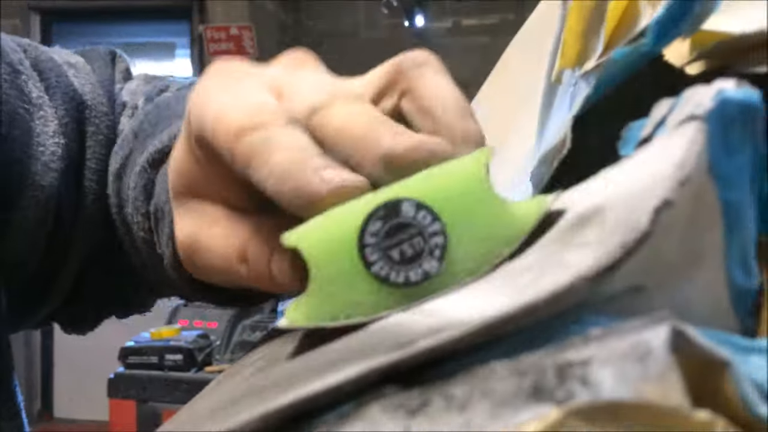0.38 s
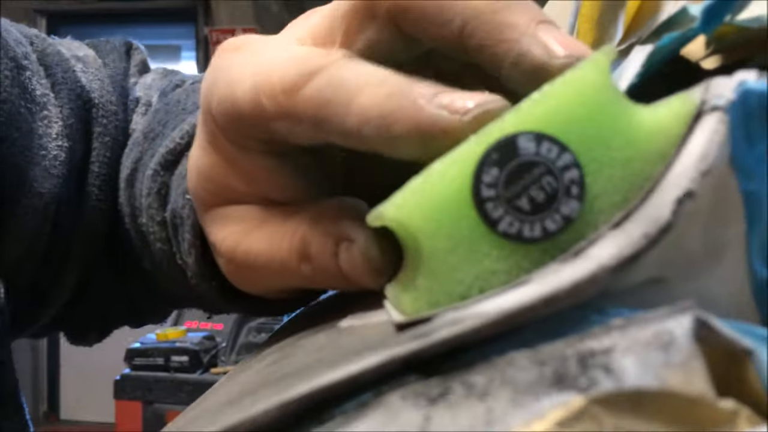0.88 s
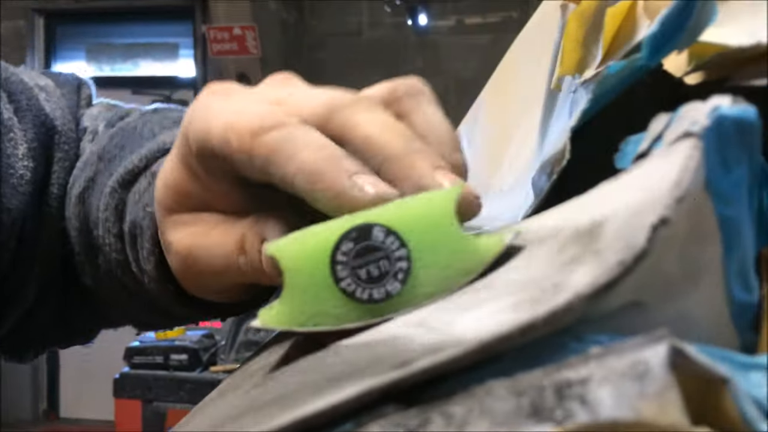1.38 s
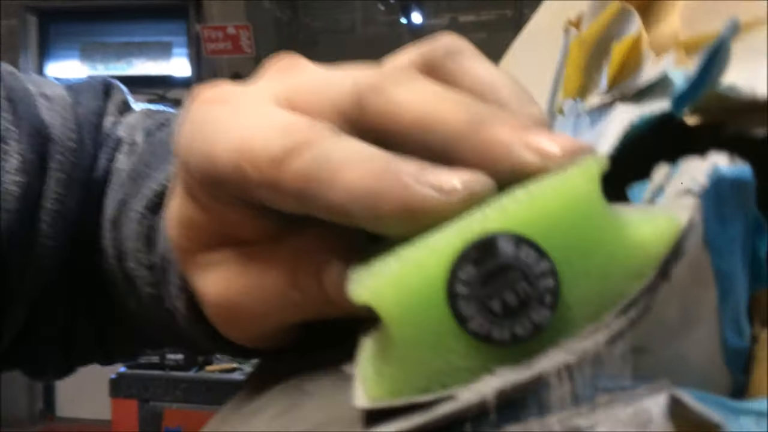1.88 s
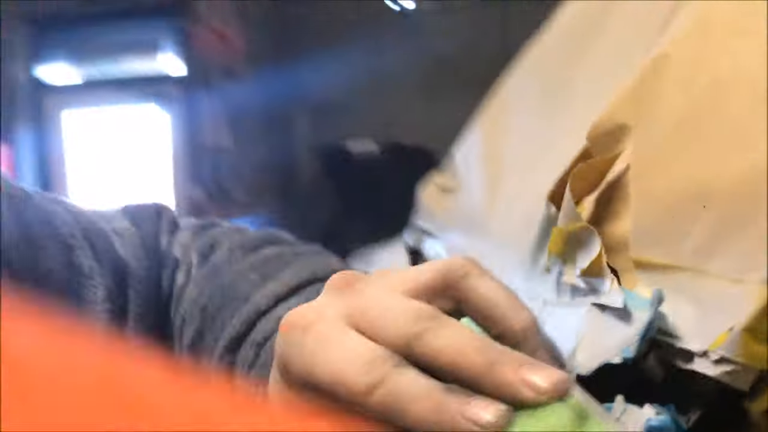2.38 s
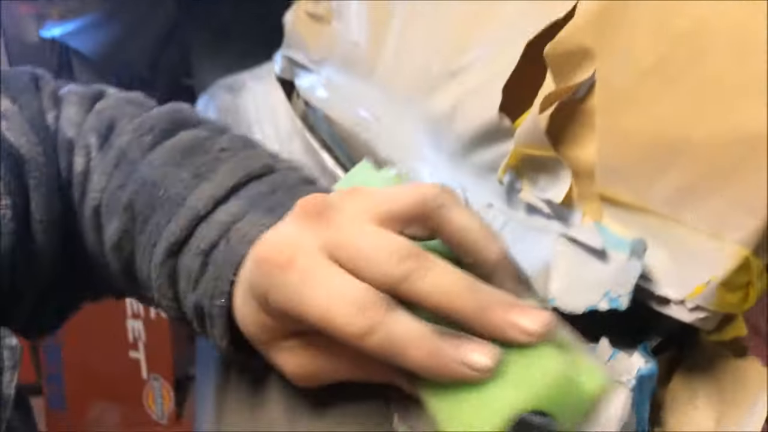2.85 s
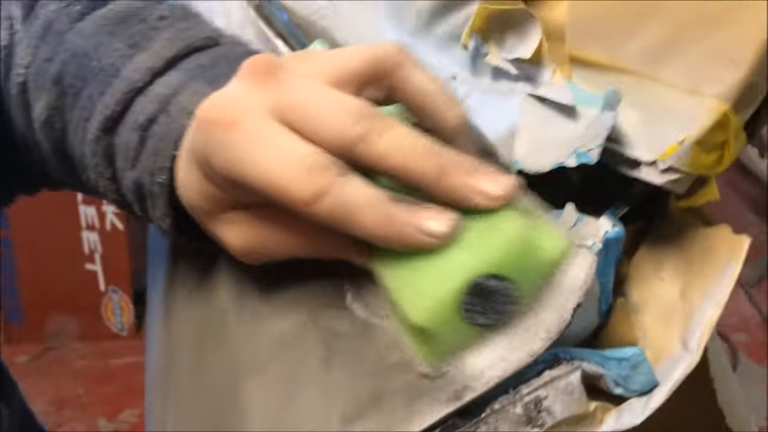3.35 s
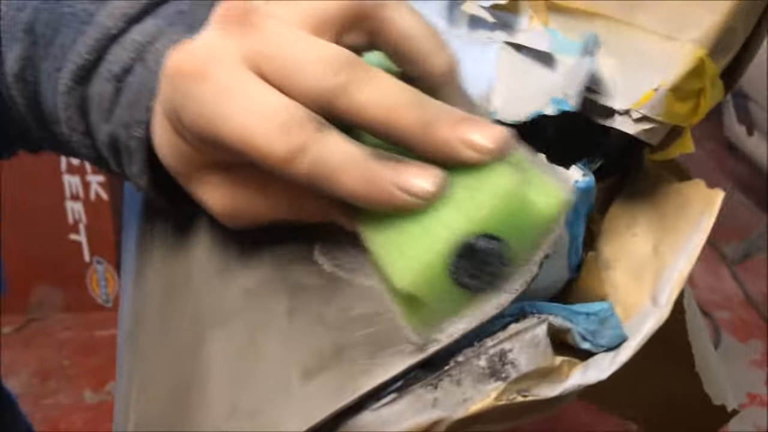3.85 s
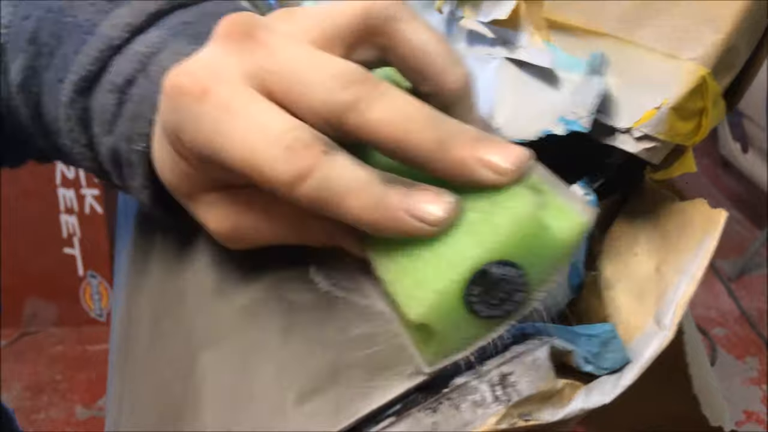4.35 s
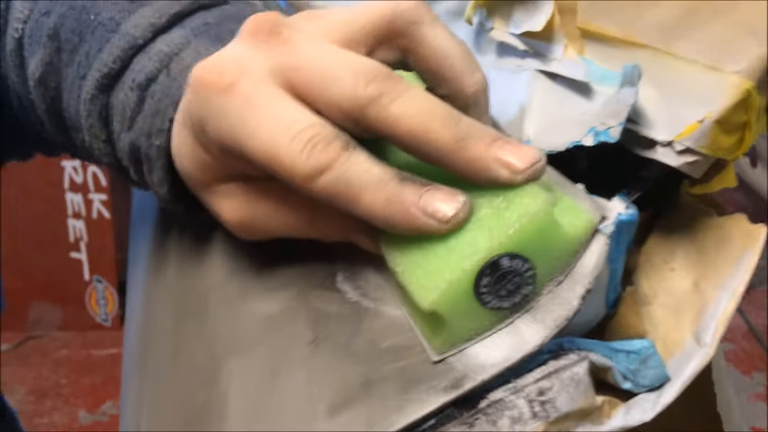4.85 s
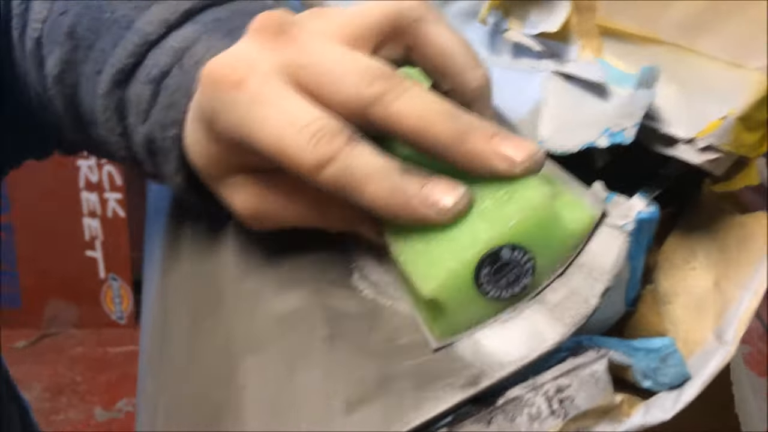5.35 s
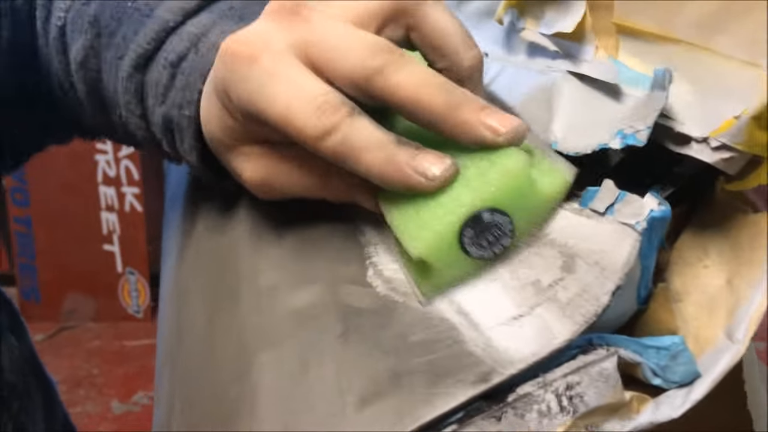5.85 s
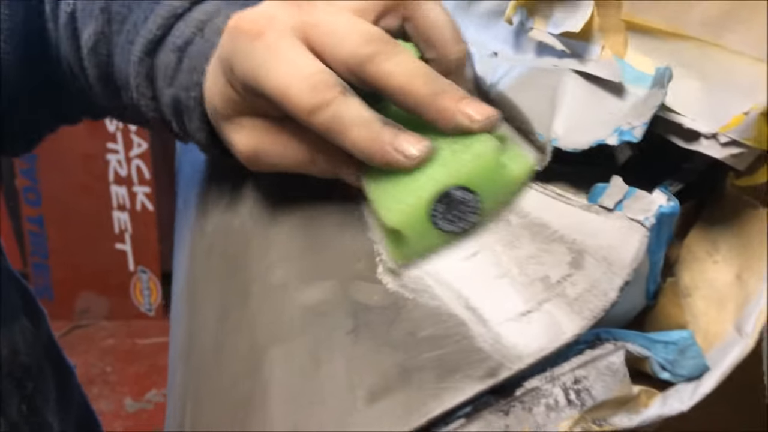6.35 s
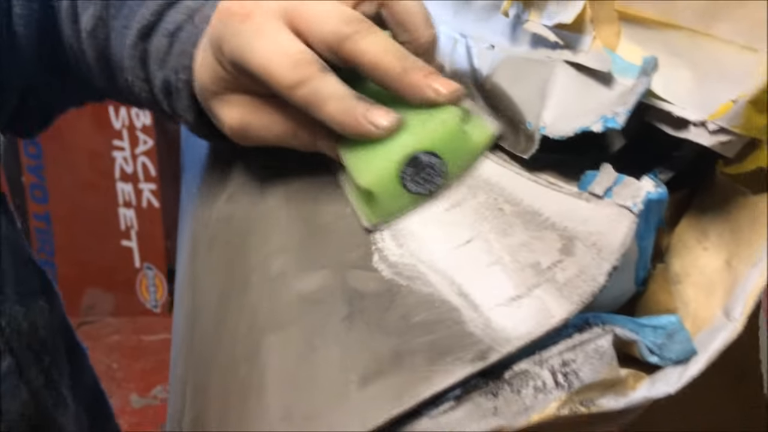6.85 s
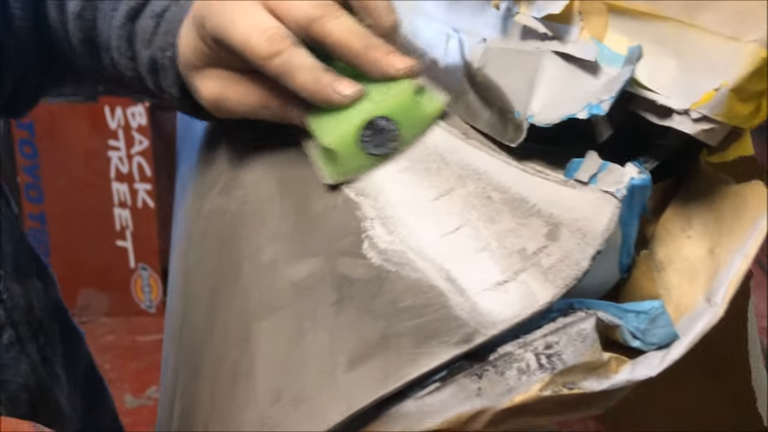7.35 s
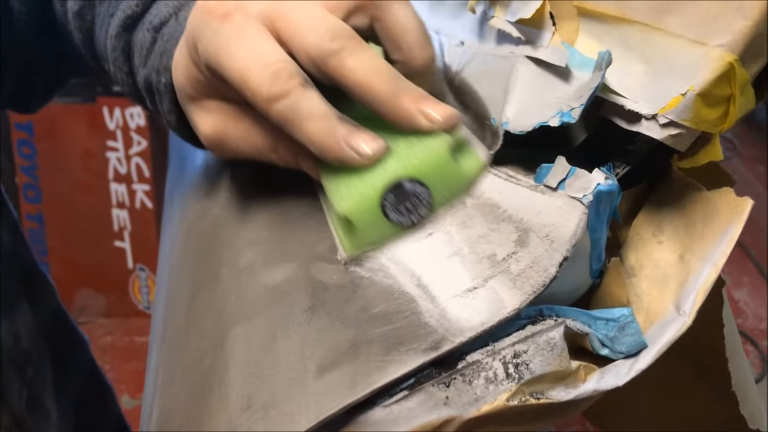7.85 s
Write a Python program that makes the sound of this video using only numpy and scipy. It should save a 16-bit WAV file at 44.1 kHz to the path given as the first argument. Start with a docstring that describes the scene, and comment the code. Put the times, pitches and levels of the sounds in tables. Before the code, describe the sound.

Sanding heard very close in mono, in a workshop with a short dull tail. From 0 to 0.75 seconds, three quick gritty scrapes with small gaps, the first already under way. Until about 1.2 seconds the block only shuffles lightly, with small creaky ticks, strongest near 1.15. A longer, duller stroke follows at 1.25, then a rapid creak of ticks around 1.6 to 1.7 and another stroke. Around 2.03 to 2.1 a cluster of low, padded bumps strikes the microphone. From 2.3 the strokes become regular, roughly four a second, each swelling and stopping with a tiny gap. They grow crisp and hissy, brightest around 5.5, then gradually duller after 6.5. A small sharp knock lands near 4.47. The last stroke, from 7.64, is longer and fades slightly. Faint air noise and a low wavering machine hum continue throughout.

```python
"""Sanding a primed panel

A foam sanding block is rubbed back and forth over a primed panel in a workshop, close to a mono microphone.
Grit catches on the primer in dense tiny clicks that ring the panel and the block, louder as the block speeds up.
In early gaps between strokes it shuffles and creaks in ticks; later its edge knocks the panel.
A quick run of bumps hits the microphone as low pulses. Behind it lie a short room tail,
coloured air noise and a far machine made of narrow noise bands and wavering tones."""
import sys
import numpy as np
from scipy import signal
from scipy.fft import rfft, irfft, next_fast_len
from scipy.io import wavfile

SR = 44100
rng = np.random.default_rng(int(sys.argv[2]) if len(sys.argv) > 2 else 0)


def volts_from_decibels(level):
    """Turn decibel levels (scalar or array-like) into linear amplitude factors."""
    exponent = np.asarray(level, float) / 20
    return 10 ** exponent


def unload_audio(sound):
    """Save the sound as a 16-bit wav file, at the path given as the first command line argument."""
    columns = np.transpose(np.atleast_2d(sound))
    # keep every value between -1 and 1, then stretch to whole-number steps
    steps = np.round(np.clip(columns, -1, 1) * 32767)
    wavfile.write(sys.argv[1], SR, steps.astype(np.int16))


N = 362502

# strokes, push and pull by turns: start_s, end_s, scratch_db (full speed, mid-stroke),
# pressure_change_db (start to end), drumming_over_scratch_db
STROKES = [(-.022, .178, -25, 9, -3.3), (.252, .465, -25.5, -5.5, -4), (.581, .754, -24.5, 4, -3),
           (1.246, 1.549, -26, -8, -5), (1.732, 1.974, -23, 7, -5.5), (2.053, 2.291, -26, -7, -7.5),
           (2.339, 2.527, -25, 9, -8), (2.585, 2.798, -25.5, 0.3, -8), (2.846, 3.021, -23, .4, -7.5),
           (3.082, 3.287, -25, 0, -7.3), (3.338, 3.523, -23, 0, -7), (3.585, 3.768, -24.5, -3, -8.5),
           (3.819, 4.004, -24.5, 0.5, -6.5), (4.061, 4.249, -25.5, 0.5, -7), (4.301, 4.487, -25.5, 0, -6),
           (4.545, 4.731, -24.5, -0.5, -8), (4.782, 4.951, -24.5, -1.5, -7.5),
           (5.019, 5.206, -25, -1.3, -8), (5.254, 5.439, -24.6, -2, -8), (5.491, 5.691, -25, 1, -7.5),
           (5.741, 5.915, -23.5, -.9, -8), (5.969, 6.159, -25, -1.6, -8), (6.208, 6.373, -23, -0.5, -8),
           (6.432, 6.647, -25.5, 2.5, -7), (6.698, 6.862, -23.5, -0.3, -7),
           (6.924, 7.133, -25.5, 1.3, -7.5), (7.187, 7.339, -24, -0.5, -6.5),
           (7.411, 7.591, -24.5, 0, -8.5), (7.641, 8.261, -25, -2.5, -8)]
# light shuffling: start_s, length_s, scratch_db, change_db (start to end), sizzle_over_scratch_db
SHUFFLES = [(.455, 0.074, -48.5, -16, -2), (0.552, .04, -63, 6, -2), (0.863, 0.083, -45, 8, 1),
            (.945, 0.075, -53, 1.1, -6), (0.993, 0.18, -53, 1.1, -13), (1.128, 0.046, -37, -2, -8.5),
            (1.147, 0.088, -50.5, -23, -15.5), (1.565, 0.17, -58, 9, -13), (1.706, 0.048, -48, 5, -17),
            (2.003, 0.049, -52, 12, -11), (2.289, .035, -55, -3, -1), (2.32, 0.031, -52, 6, -9)]
# the microphone moves about the block: time_s, sizzle_over_scratch_db,
# valley_over_scratch_db, fizz_over_sizzle_db
VIEW = [(0, 6, -3, -6), (.35, 2.5, -6, -8), (.7, 1.5, -3, -2.5), (1.35, -3, -6, -11), (1.9, -1.5, -5.5, -8),
        (2.4, .5, -9, -8), (2.95, 3.5, -21, -6), (3.6, 4.5, -16, -7.5), (4.3, 5.5, -10.5, -8.5),
        (5.5, 7, -9, -8), (6.3, 3, -8, -9), (7.3, 0.1, -5.5, -5), (7.7, -1.2, -10, -3.5),
        (8.22, -2.3, -7.5, -18)]

# what the grit rings, low to high; each resonance is passed twice: centre_hz, width_hz (one pass), gain_db
RUMBLE_MODES = [(88, 140, -14), (227, 218, 0.5), (454, 314, -3)]  # low panel modes
PANEL_MODES = [(642, 650, -12), (944, 420, -9.5), (1162, 174, -4.5), (1312, 350, -6), (1575, 560, -1)]  # panel drumming
VALLEY_MODES = [(2190, 510, -1.5), (2680, 1260, 1.5)]  # between drumming and scratch
SCRATCH_MODES = [(3444, 1130, -0.5), (4030, 2080, -1.9), (4780, 2600, -2.5)]
SIZZLE_MODES = [(6430, 2000, -0.5), (7330, 2430, 2), (8310, 1900, 0), (9200, 2900, -6)]
FIZZ_MODES = [(11750, 6600, 1), (13800, 13000, -9)]  # finest grit

# each layer grows as speed to a power, the finer the grit the steeper
DRUM_POWER, SCRATCH_POWER, SIZZLE_POWER, FIZZ_POWER = 0.65, 0.88, 1.83, 2.85
GATHER_S, BRAKE_S = 0.053, 0.036  # time constants of the hand gathering speed and braking
SET_OFF_S, STOP_S = 0.022, 0.019  # creep before the start; slide to rest after the end
BREAK_FREE_S, REST_DB = 0.009, -16  # how fast the grit bites; level while creeping or at rest
PUSH_SIZZLE_DB, PUSH_FIZZ_DB = 0.02, 0.9  # added on pushes, taken off on pulls
RUMBLE_DB = -14.5  # over drumming
SHUFFLE_POWER, SHUFFLE_RAGGED_DB = 1.2, 1.8  # half-sine swell to this power; clumpiness of a light touch
SHUFFLE_VALLEY_DB, SHUFFLE_FIZZ_DB = -3, -4  # valley over scratch; fizz over sizzle
SHUFFLE_DRUM_DB, DRUM_PER_SIZZLE = -6.5, -0.9  # the duller a shuffle, the more it drums the panel

# foam slipping on the primer in lone ticks: time_s, level_db
TICKS = [(.217, -35), (1.031, -38), (1.052, -35), (1.146, -27), (1.154, -25), (1.18, -38), (1.598, -49),
         (1.606, -42), (1.6135, -41), (1.623, -40), (1.635, -37), (1.646, -33), (1.658, -34.5),
         (1.6697, -34), (1.6885, -32), (1.729, -45), (2.015, -36), (4.752, -43), (4.988, -41), (6.678, -50),
         (6.908, -44), (7.612, -44)]
# what a tick rings: pitch_hz, level_db, t60_s
TICK_MODES = [(1400, -2, .012), (1990, -1, 0.009), (2720, -1.5, 0.008), (3620, -5, .011)]
# the block's edge knocking the panel: time_s, level_db
KNOCKS = [(4.4742, -18), (4.498, -35)]
# what a knock rings: pitch_hz, level_db, t60_s
KNOCK_MODES = [(330, -13, .01), (800, -8, .008), (1450, 0, .008)]
# bumps on the microphone body: time_s, level_db (before the padding), pulse_hz (sets its time scale)
BUMPS = [(2.0283, -13, 120), (2.053, -21, 120), (2.0815, -19.5, 208), (2.092, -23, 140), (2.102, -27, 201)]

ROOM_T60_S, ROOM_CUT_HZ, ROOM_DB = 0.2, 1700, -20

# far machine, looser bands, each passed twice: centre_hz, width_hz (one pass), rms_db (before the swell)
HUM_BANDS = [(120, 37, -65.5), (228.4, 25, -59.5)]
# far machine, steadier tones: pitch_hz, rms_db (before wavering and swell)
HUM_TONES = [(43, -65.5), (173, -58)]
# machine load: time_s, gain_db
HUM_SWELL = [(0, 1), (1.3, 2), (2.7, 3.5), (3.4, -2), (5.5, -0.5), (6.5, 4), (8.22, -2)]
# colour of the workshop air: frequency_hz, relative_level_db
AIR_COLOUR = [(24, -43), (40, -8.5), (206, 0), (329, -9.5), (710, -11), (845, -13), (1060, -11),
              (1610, -50), (1730, -13), (15000, -28.5)]
AIR_DB = -50  # rms, before its slow drift


def rms_one(x):
    """Scale to unit rms."""
    return x / np.sqrt(np.mean(x ** 2) + 1e-20)


def drift(rate_hz):
    """Smooth random wander of unit rms, changing about rate_hz times a second."""
    r = np.exp(-80 * np.pi * rate_hz / SR)  # computed on every 40th sample
    noise = rng.standard_normal(N // 40 + 2002)
    slow = signal.lfilter([1], [1, -2 * r, r * r], noise)[2000:]
    return np.interp(np.arange(N) / 40, np.arange(len(slow)), rms_one(slow))


def curve(rows, column):
    """One column of a table in time, sample by sample."""
    rows = np.array(rows)
    return np.interp(np.arange(N) / SR, rows[:, 0], rows[:, column])


def resonance(x, hz, width_hz):
    """Two-pole resonance, gain about 1 on top."""
    r = np.exp(-np.pi * max(width_hz, 2) / SR)
    feedback = [1, -2 * r * np.cos(2 * np.pi * hz / SR), r * r]
    return signal.lfilter(np.array([1, 0, -1]) * (1 - r * r) / 2, feedback, x)


def motion(start_s, length_s, level_db, change_db):
    """Samples of one stroke, its speed 0-1, and its pressure with the quick start and stop."""
    first = max(int((start_s - SET_OFF_S) * SR), 0)
    last = min(int((start_s + length_s + STOP_S) * SR), N)
    span = np.arange(first, last)
    t = span / SR - start_s
    gathering = 1 - np.exp(-(t + SET_OFF_S) / GATHER_S)
    braking = 1 - np.exp((t - length_s - STOP_S) / BRAKE_S)
    edge_db = np.interp(t, [-BREAK_FREE_S, 0, length_s, length_s + STOP_S], [REST_DB, 0, 0, REST_DB])
    pressure = volts_from_decibels(level_db + change_db * (t / length_s - 0.5) + edge_db)
    return span, np.clip(gathering * braking, 0, 1), pressure


def stroke_levels():
    """Speed and pressure of the block drive the level of every grit layer."""
    panel, scratch, sizzle, fizz = np.zeros((4, N))
    bright, airy = volts_from_decibels(curve(VIEW, column=1)), volts_from_decibels(curve(VIEW, column=3))
    for k, (start_s, end_s, level_db, change_db, drum_db) in enumerate(STROKES):
        push = (-1) ** k  # +1 push, -1 pull
        span, speed, pressure = motion(start_s, end_s - start_s, level_db, change_db)
        panel[span] += pressure * speed ** DRUM_POWER * volts_from_decibels(drum_db)
        scratch[span] += pressure * speed ** SCRATCH_POWER
        fine = pressure * bright[span]
        sizzle[span] += fine * speed ** SIZZLE_POWER * volts_from_decibels(push * PUSH_SIZZLE_DB)
        fizz[span] += fine * speed ** FIZZ_POWER * airy[span] * volts_from_decibels(push * PUSH_FIZZ_DB)
    valley = scratch * volts_from_decibels(curve(VIEW, column=2))
    return np.array([panel, valley, scratch, sizzle, fizz])


def shuffle_levels():
    """Light brushes swell and fade raggedly, since a light touch catches in clumps."""
    levels = np.zeros((5, N))
    ragged = volts_from_decibels(SHUFFLE_RAGGED_DB * drift(70))
    for start_s, length_s, level_db, change_db, sizzle_db in SHUFFLES:
        span = np.arange(int(start_s * SR) + 1, int((start_s + length_s) * SR))
        along = (span / SR - start_s) / length_s
        swell = np.sin(np.pi * along) ** SHUFFLE_POWER
        brush = volts_from_decibels(level_db + change_db * (along - 0.5)) * swell * ragged[span]
        drum_db = SHUFFLE_DRUM_DB + DRUM_PER_SIZZLE * sizzle_db
        # panel, valley, scratch, sizzle, fizz
        layers_db = [drum_db, SHUFFLE_VALLEY_DB, 0, sizzle_db, sizzle_db + SHUFFLE_FIZZ_DB]
        levels[:, span] += volts_from_decibels(layers_db)[:, None] * brush
    return levels


def grit(per_s, spread_db):
    """Grains catch at random moments with uneven strength and sign."""
    sizes = volts_from_decibels(spread_db * np.minimum(rng.exponential(1, N), 5)) * rng.choice([-1, 1], N)
    return sizes * (rng.random(N) < per_s / SR) + 1e-18


def rung(modes, grains, patchy_db):
    """Grains ring each mode, twice for steep skirts; the contact patch moves, so each swells on its own."""
    out = 0
    for k, (hz, width_hz, gain_db) in enumerate(modes):
        once = resonance(grains[k % len(grains)], hz, width_hz)
        out = out + volts_from_decibels(gain_db + patchy_db * drift(14.6)) * resonance(once, hz, width_hz)
    return rms_one(out)


def sanding():
    """Dense grit clicks ring panel and block, each layer following the strokes and shuffles."""
    panel, valley, scratch, sizzle, fizz = stroke_levels() + shuffle_levels()
    coarse = [grit(8000, 2.13), grit(8000, 3.13)]
    fine = [grit(12000, 1.3), grit(12000, 2.38)]
    swapped = coarse[::-1]
    drumming = rung(PANEL_MODES, coarse, 1.4)
    rumble = volts_from_decibels(RUMBLE_DB) * rung(RUMBLE_MODES, swapped, 3.6)
    low = panel * (drumming + rumble)
    middle = scratch * rung(SCRATCH_MODES, coarse, 0.97) + valley * rung(VALLEY_MODES, fine, 2.7)
    high = sizzle * rung(SIZZLE_MODES, fine, 2.4) + fizz * rung(FIZZ_MODES, swapped, 1.8)
    uneven_primer = volts_from_decibels(0.41 * drift(19))  # under the whole block
    return uneven_primer * (low + middle + high)


def struck(blows, modes):
    """Each blow rings short decaying modes, neighbours in opposite phase, with uneven strengths."""
    at, out = [round(time_s * SR) for time_s, _ in blows], np.zeros(N)
    chance_db = rng.normal(0, 1.9, (len(at), len(modes)))
    for k, (hz, level_db, t60_s) in enumerate(modes):
        clicks = np.full(N, 1e-18)
        clicks[at] = volts_from_decibels(np.array(blows)[:, 1] + level_db + chance_db[:, k])
        r, w = volts_from_decibels(-60 / (t60_s * SR)), 2 * np.pi * hz / SR
        out += (-1) ** k * signal.lfilter([0, np.sin(w)], [1, -2 * r * np.cos(w), r * r], clicks)
    return out


def foam_ticks():
    """The foam slips on the primer in lone ticks, band-limited for a soft contact."""
    soft = signal.butter(2, [800, 4500], "band", fs=SR, output="sos")
    return signal.sosfilt(soft, struck(TICKS, TICK_MODES))


def edge_knocks():
    """The block's edge knocks the panel and rings its short modes."""
    return struck(KNOCKS, KNOCK_MODES)


def microphone_bumps():
    """A push on the diaphragm: a short dip, a hump, then a slower swing back."""
    t, out = np.arange(N) / SR, np.zeros(N)
    for time_s, level_db, pulse_hz in BUMPS:
        cycles = (t - time_s) * pulse_hz
        before = np.cos(2 * np.pi * 1.23 * cycles) * np.exp(-(cycles / 0.59) ** 2)
        after = np.cos(2 * np.pi * 0.64 * np.abs(cycles) ** 0.82) * np.exp(-np.abs(cycles) / 0.75)
        out += volts_from_decibels(level_db) * np.where(cycles < 0, before, after)
    padding = signal.butter(2, 300, fs=SR, output="sos")  # a padded body dulls the push
    return signal.sosfilt(padding, out)


def room(x):
    """Short diffuse tail of decaying noise off nearby surfaces, duller than the direct sound."""
    t = np.arange(SR // 2) / SR
    tail = rng.standard_normal(len(t)) * volts_from_decibels(-60 * t / ROOM_T60_S) * (t > 0.003)
    tail = signal.lfilter([1], [1, -np.exp(-2 * np.pi * ROOM_CUT_HZ / SR)], tail)
    return volts_from_decibels(ROOM_DB) * signal.fftconvolve(x, tail / np.sqrt(np.sum(tail ** 2)))[:N]


def far_machine():
    """Narrow noise bands and tones wavering with the motor speed, swelling with the load."""
    hum = np.zeros(N)
    for band_hz, width_hz, level_db in HUM_BANDS:
        once = resonance(rng.standard_normal(N), band_hz, width_hz)
        hum += volts_from_decibels(level_db) * rms_one(resonance(once, band_hz, width_hz))
    for tone_hz, level_db in HUM_TONES:
        turns = np.cumsum(tone_hz + 0.69 * drift(2.3)) / SR
        hum += volts_from_decibels(level_db + 2.9 * drift(4.3)) * np.sqrt(2) * np.sin(2 * np.pi * turns)
    return volts_from_decibels(curve(HUM_SWELL, column=1)) * hum


def workshop_air():
    """White noise coloured in the spectrum, its level drifting slowly."""
    size = next_fast_len(N)
    hz = np.maximum(np.arange(size // 2 + 1) * SR / size, 10)
    point_hz, point_db = np.transpose(AIR_COLOUR)
    colour = volts_from_decibels(np.interp(np.log(hz), np.log(point_hz), point_db))
    noise = irfft(rfft(rng.standard_normal(size)) * colour, size)[:N]
    return volts_from_decibels(AIR_DB + 2.0 * drift(1.4)) * rms_one(noise)


def scene():
    """Everything reaches one microphone, heard alike on both channels; only the block excites the room."""
    block = sanding() + foam_ticks() + edge_knocks()
    mono = block + room(block) + microphone_bumps() + far_machine() + workshop_air()
    return np.tile(mono, (2, 1))


def roll_off(x):
    """The treble ends steeply here."""
    return signal.sosfilt(signal.butter(12, 15420, fs=SR, output="sos"), x)


def record(dry):
    """The finished mix goes through its last stage."""
    return roll_off(dry)


dry = scene()
out = record(dry)
unload_audio(out)
```